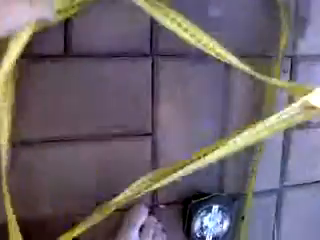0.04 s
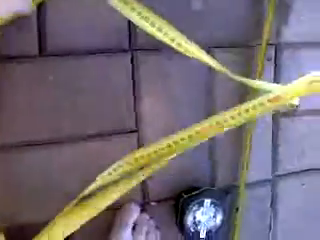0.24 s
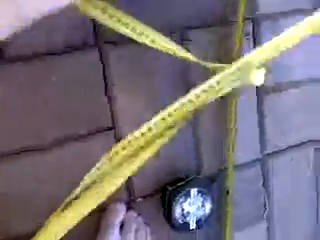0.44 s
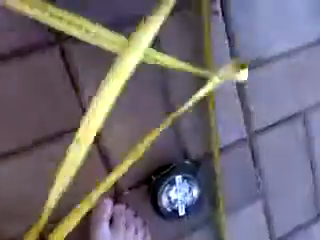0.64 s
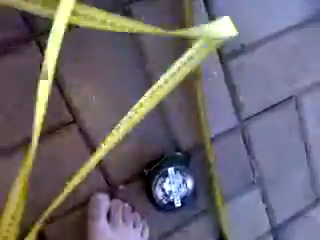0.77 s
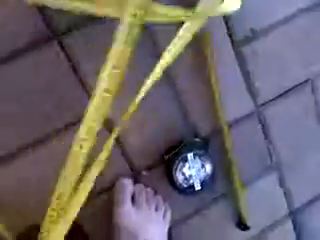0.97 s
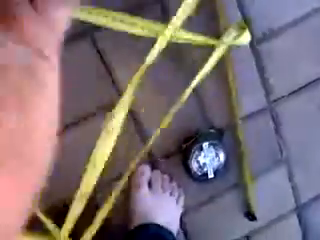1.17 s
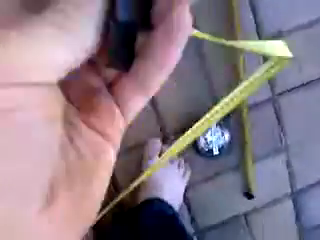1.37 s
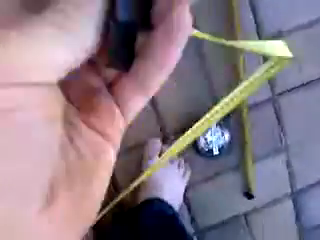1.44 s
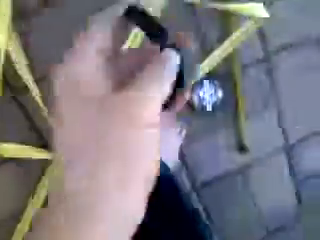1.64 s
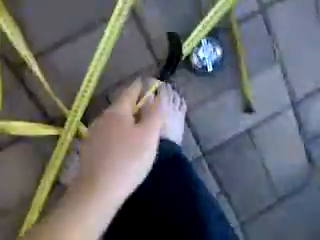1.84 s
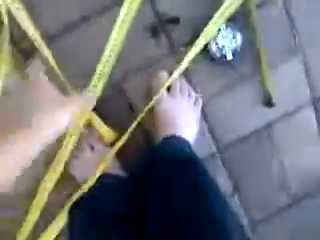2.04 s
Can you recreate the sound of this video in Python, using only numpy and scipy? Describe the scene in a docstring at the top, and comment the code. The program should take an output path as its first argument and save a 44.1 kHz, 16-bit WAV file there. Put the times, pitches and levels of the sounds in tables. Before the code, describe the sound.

A loose steel tape measure blade rattles and crinkles as it is bunched up by hand near the microphone. A bright burst comes at 0.25 seconds, then lighter ticks and one very sharp click at 0.85. Dense metallic chatter and scraping follow from 1.0 to 1.4. Another snap at 1.6 rings briefly, and the rattle fades by 2 seconds. A faint outdoor rumble lies underneath.

```python
"""A faint outdoor rumble, then a sharp snap and bursts of metallic chatter: a loose steel tape blade
is bunched up by hand close to a small mono microphone. Its loops slide and tap on one another, the
curved strip buckles with snaps, and an edge clicks, once very hard. Each contact excites the bending
modes of the thin steel, which are dispersive: the treble arrives first. Air and handling lie below."""
import sys
import numpy as np
from scipy import signal
from scipy.fft import rfft, irfft, next_fast_len
from scipy.io import wavfile
from scipy.ndimage import uniform_filter1d, minimum_filter1d, map_coordinates

SR = 44100
rng = np.random.default_rng(int(sys.argv[2]) if len(sys.argv) > 2 else 0)


def master_out(mix):
    """Clip the mix to full scale and print it as 16-bit PCM to the path in sys.argv[1]."""
    frames = np.transpose(np.atleast_2d(mix))
    ceiling = np.clip(frames, -1, 1)
    pcm = np.round(ceiling * 32767).astype(np.int16)
    wavfile.write(sys.argv[1], SR, pcm)


N = 92610
T = np.arange(N) / SR
TAIL = np.arange(SR // 3) / SR  # time since a contact

# Levels are relative within each table.
# spectra of the outdoor air, the low rumble and the bumps of the hand (f/Hz, level/dB)
AIR_SPECTRUM = [(60, -21), (130, -6.5), (180, -12.5), (300, -11), (400, -14), (700, -16.5), (1000, -15.5),
                (1600, -12), (2600, -19.5), (3100, -18.5), (7000, -29.5), (9000, -57.5)]
RUMBLE_SPECTRUM = [(12, -34), (20, 1.5), (59, -3.5), (100, 0.5), (147, -9), (178, -4.5), (455, -10),
                   (586, -13), (700, -14), (910, -39.5), (1540, -120)]
BUMP_SPECTRUM = [(20, 0), (50, 4.5), (95, -2), (160, -26), (400, -42)]
# envelope of the rumble (t/s, level/dB)
RUMBLE_ENVELOPE = [(0, -45), (.05, -46.5), (.55, -40.5), (.65, -43), (1.1, -42), (1.35, -45.5), (1.5, -56),
                   (1.6, -44.5), (2.1, -47.5)]
# envelope of a soft low hum (t/s, level/dB)
HUM_ENVELOPE = [(0, -64), (.045, -38), (.2, -44), (.3, -47), (.52, -45), (.62, -58.5), (2.1, -67)]
# the hand bumps the microphone's housing (t/s, level/dB, Gaussian width/s)
HAND_BUMPS = [(0.732, -38, 0.025), (1.444, -32, 0.029), (1.521, -29, 0.011)]
# envelope of the long loops' wobble (t/s, level/dB)
LOOP_ENVELOPE = [(0, -60), (.19, -58), (.215, -34.5), (.27, -30.5), (.34, -41), (.5, -46), (.7, -40.5),
                 (.755, -39), (.835, -48), (.865, -32), (.91, -39), (.98, -46), (1.06, -33.5), (1.12, -26),
                 (1.26, -34.5), (1.4, -42), (1.56, -55), (1.61, -38), (1.68, -42), (1.76, -47.5),
                 (1.95, -44.5), (2.1, -50)]
# spectrum of that wobble (f/Hz, level/dB)
LOOP_SPECTRUM = [(300, -31.5), (550, -13), (720, -16), (900, -3.5), (1150, -1.5), (1550, -2), (1850, -3),
                 (2600, -28), (5000, -61)]
# a free stretch of the blade sings briefly (t/s, f/Hz, bandwidth/Hz, level/dB, T60/s)
PINGS = [(.107, 2821, 150, -41, .18), (0.239, 2770, 497, -19, 0.26), (0.582, 2480, 500, -24.5, .12),
         (0.7346, 2600, 597, -17, 0.084), (1.1, 2300, 400, -16, 0.26), (1.394, 4420, 550, -18, 0.17),
         (1.526, 2310, 79.6, -26, .09), (1.597, 2410, 250, -15, 0.1), (1.677, 2164, 60, -21.5, 0.13)]
# an edge strikes hard (t/s, level/dB, rise time/s)
EDGE_STRIKES = [(0.7037, -8, .0005), (0.855, 6.5, 0.0012), (1.5968, -3, 0.0024)]
# modes of the struck edge (f/Hz, level/dB, T60/s)
EDGE_MODES = [(6300, 0.5, 0.017), (7180, -7.5, 0.014), (5432, -17, 0.048)]
# spectral envelope of the blade (f/Hz, level/dB)
STEEL_SPECTRUM = [(240, -37.5), (400, -26), (589, -22.5), (723, -24.5), (900, -18), (1200, -13),
                  (1550, -9.5), (1900, -5.5), (2200, -0.74), (2400, -0.7), (2850, -3), (3200, -6),
                  (3900, -4.5), (4400, -3.04), (5000, -0.5), (5900, -1), (6300, -1.3), (7050, -3.5),
                  (7400, -11.5), (9000, -53.5)]
# modes that outlast the blade's dense ring (f/Hz, level/dB)
BLADE_MODES = [(1154, -1), (1518, -19.5), (1810, 0.5), (2223, -0.5), (2363, -1.5), (2556, 2.5),
               (2795, -4.5), (4198, -6), (4551, -1), (5404, -2), (6138, -2), (6540, -12)]
# how hard the loops rub and chatter (t/s, level/dB)
EFFORT = [(0, -40), (.085, -53), (.125, -46), (.192, -45), (.205, -31), (.248, -11), (.28, -16), (.32, -25),
          (.365, -24), (.39, -22), (.46, -19.5), (.485, -26), (.53, -30), (.56, -23), (.6, -23), (.64, -28),
          (.665, -24), (.695, -28), (.73, -27), (.75, -21), (.78, -28), (.84, -30.5), (.87, -17.5),
          (.92, -18), (1.01, -26), (1.045, -14), (1.08, -14.5), (1.11, -11.5), (1.19, -14.5), (1.225, -14),
          (1.275, -19), (1.315, -19), (1.38, -24), (1.41, -19), (1.46, -25), (1.495, -25), (1.515, -31),
          (1.575, -31.5), (1.605, -14.5), (1.665, -20.5), (1.735, -24), (1.765, -20.5), (1.92, -35),
          (2, -36), (2.1, -45.5)]
# the strip buckles (t/s, level/dB, spectral tilt/(dB per octave))
SNAPS = [(.2455, -18, 10), (.252, -8, 4), (.377, -21, -3), (.4075, -21, -1), (0.5409, -25, -2.5),
         (0.581, -19.5, 0), (0.6601, -25, -2), (0.7034, -17.5, 2), (0.735, -12, 0), (0.8029, -23.5, -3),
         (0.8554, -10, -2.5), (.868, -13.5, -2), (0.9046, -14.5, 1.5), (1.2052, -12, 3),
         (1.221, -16.5, 8.5), (1.3458, -24.5, -1), (1.5905, -18.5, -2), (1.5968, -14.5, 1),
         (1.628, -26, 1.5), (1.9734, -32.5, 1)]

RING_T60_S, MODE_T60_S = .17, .25  # decay of the blade's dense ring and of its separate modes
MODE_DETUNING = .0061  # relative scatter of a mode's frequency as the strip bends
DISPERSION_S = .001192  # group delay of bending waves at 1 kHz
CONTACTS_PER_S = 600  # at an effort of -19.5 dB
DENSER_PER_DB, BRIGHTER_PER_DB = .21, .1148  # contact rate and treble, in dB per dB of effort
AIR_DB, SLIDE_DB, CHATTER_DB, SNAP_DB = -46.5, -2.5, -3, -1  # mixing gains


def amp(db):
    """Amplitude ratio of a level in decibels."""
    return 10 ** (np.asarray(db) / 20)


def unit_rms(x):
    """Normalisation to an rms of 1."""
    return x / np.sqrt(np.mean(x ** 2) + 1e-20)


def envelope(rows):
    """Linear interpolation of (t/s, level/dB) rows to one level per sample."""
    return np.interp(T, *np.transpose(rows))


def spectral_gain(spectrum, hz):
    """Magnitude response: (f/Hz, level/dB) rows interpolated on a logarithmic frequency axis."""
    f, db = np.transpose(spectrum)
    return amp(np.interp(np.log(hz + 1), np.log(f + 1), db))


def filtered(x, response):
    """Linear filtering: the spectrum of x is multiplied by a frequency response."""
    size = next_fast_len(len(x) + 8192)
    return irfft(rfft(x, size) * response(np.fft.rfftfreq(size, 1 / SR)), size)[:len(x)]


def low_pass(x, cutoff_hz, order):
    """Zero-phase filtering with a Butterworth magnitude response."""
    return filtered(x, lambda hz: 1 / np.sqrt(1 + (hz / cutoff_hz) ** (2 * order)))


def noise(spectrum):
    """Spectral shaping of white noise, at an rms of 1."""
    return unit_rms(filtered(rng.standard_normal(N), lambda hz: spectral_gain(spectrum, hz)))


def fluctuation(knots_per_s):
    """Smooth random modulation: a spline through Gaussian values."""
    return map_coordinates(rng.standard_normal(int(N * knots_per_s / SR) + 4), [T * knots_per_s])


def decay(t60):
    """Exponential damping by 60 dB in t60 seconds."""
    return np.exp(-np.log(1000) * TAIL / t60)


def add(out, start_s, x):
    """Superposition of x on out, beginning at start_s."""
    part = out[max(round(start_s * SR), 0):][:len(x)]
    part += x[:len(part)]


def background():
    """Outdoor air and handling as shaped noise, with a low hum that wavers by phase modulation."""
    hum_phase = 2 * np.pi * 60 * T + .5 * fluctuation(10)
    hum = np.sqrt(2) * np.sin(hum_phase) * amp(envelope(HUM_ENVELOPE))
    air = amp(AIR_DB) * noise(AIR_SPECTRUM)
    rumble = amp(envelope(RUMBLE_ENVELOPE)) * noise(RUMBLE_SPECTRUM)
    bumps = sum(amp(db) * np.exp(-.5 * ((T - t) / width_s) ** 2) for t, db, width_s in HAND_BUMPS)
    return air + rumble + hum + bumps * noise(BUMP_SPECTRUM)


def loop_wobble():
    """Modal overlap: the dense low bending modes of the hanging loops merge into a band of noise."""
    flutter = amp(1.5 * fluctuation(60))
    return amp(envelope(LOOP_ENVELOPE)) * unit_rms(flutter * noise(LOOP_SPECTRUM))


def pings():
    """Free vibration: a cluster of close modes in a free stretch of blade swells and dies away."""
    out = np.zeros(N)
    for t, hz, width_hz, db, t60 in PINGS:
        excitation = rng.standard_normal(len(TAIL))
        cluster = filtered(excitation, lambda f: 1 / (1 + (2 * (f - hz) / width_hz) ** 4))
        rise_s = .016 * t60
        shape = decay(t60) * (1 - np.exp(-TAIL / rise_s))
        add(out, t, amp(db) * unit_rms(cluster * shape) * np.sqrt(np.mean(shape ** 2)))
    return out


def edge_clicks():
    """Impact excitation: a hard strike of an edge sets high, strongly damped modes ringing."""
    out = np.zeros(N)
    ring = sum(amp(db) * decay(t60) * np.sin(2 * np.pi * hz * TAIL) for hz, db, t60 in EDGE_MODES)
    for t, db, rise_s in EDGE_STRIKES:
        onset = 1 - np.exp(-(TAIL / rise_s) ** 2)
        add(out, t, amp(db) * ring * onset)
    return out


def sliding():
    """Friction noise: steel scraping on steel gives a grainy hiss that follows the effort."""
    grain = amp(1.73 * fluctuation(250))
    return amp(SLIDE_DB + envelope(EFFORT)) * unit_rms(grain * noise(STEEL_SPECTRUM))


def brighten(x, corner_hz=4000):
    """Harder contact excites higher frequencies: the treble rises and falls with the effort."""
    treble = filtered(x, lambda hz: 1 / (1 + (corner_hz / (hz + 1)) ** 4))
    treble_gain = amp(BRIGHTER_PER_DB * (envelope(EFFORT) + 17.5))
    return x + treble * (treble_gain - 1)


def flex(x, depth_db=1.55):
    """Time-varying resonance: as the loops bend, random patches of the spectrum swell and fade."""
    spectrogram = signal.stft(x, nperseg=1024)[2]
    patches = rng.standard_normal(spectrogram.shape)
    for _ in range(2):
        patches = uniform_filter1d(patches, size=5, axis=0)  # across frequency
        patches = uniform_filter1d(patches, size=4, axis=1)  # across time
    gain = unit_rms(amp(depth_db * unit_rms(patches)))
    return signal.istft(spectrogram * gain, nperseg=1024)[1][:N]


def blade_response(crack_t60, ring_db, tilt_db):
    """Impulse response of unit energy: a crack, a dense ring and longer modes, spread by dispersion."""
    dense = rng.standard_normal(len(TAIL)) * (decay(crack_t60) + amp(ring_db) * decay(RING_T60_S))
    modes = np.zeros(len(TAIL))
    for hz, db in BLADE_MODES:
        strength = amp(db + 3 * rng.standard_normal())
        detuned_hz = hz * (1 + MODE_DETUNING * rng.standard_normal())
        modes += strength * np.sin(2 * np.pi * (detuned_hz * TAIL + rng.random()))

    def steel(hz):
        """Bending-wave dispersion: group delay falls as the square root of frequency rises."""
        khz = np.maximum(hz, 100) / 1000
        dispersion = np.exp(-4j * np.pi * hz * DISPERSION_S / np.sqrt(khz))
        return spectral_gain(STEEL_SPECTRUM, hz) * amp(tilt_db * np.log2(khz)) * dispersion
    ring = filtered(dense + amp(-22) * unit_rms(modes) * decay(MODE_T60_S), steel)
    return ring / np.linalg.norm(ring)


def chatter(places=12):
    """Random impacts: loops tap at several places on the strip, denser and harder with more effort."""
    effort_db = envelope(EFFORT)
    rate = CONTACTS_PER_S * amp(DENSER_PER_DB * (effort_db + 19.5))
    taps_due = np.cumsum(rate) / SR
    count = int(taps_due[-1])
    jitter, size_draw, place_draw = rng.random((count, 3)).T
    at = np.minimum(np.searchsorted(taps_due, np.arange(count) + 2 * jitter - .5), N - 1)
    scatter_db = 3 * np.minimum(-np.log(1 - size_draw), np.pi)  # capped exponential distribution
    # dividing by the root of the rate makes the mean power follow the effort alone
    strength = unit_rms(amp(scatter_db)) * amp(effort_db[at]) * np.sqrt(SR / rate[at])
    place = (place_draw * places).astype(int)
    out = np.zeros(N)
    for k in range(places):
        taps = np.bincount(at, strength * (place == k), N)
        ring = blade_response(crack_t60=.008, ring_db=-9, tilt_db=2.6 * rng.standard_normal())
        out += signal.fftconvolve(taps, ring)[:N]
    return amp(CHATTER_DB) * out


def snaps():
    """Snap-through buckling: the curved strip gives way suddenly, and its whole length rings."""
    out = np.zeros(N)
    for t, db, tilt_db in SNAPS:
        ring = blade_response(crack_t60=.03, ring_db=-7.5, tilt_db=tilt_db)
        add(out, t, amp(SNAP_DB + db) * np.sqrt(SR / 100) * ring)
    return out


def scene():
    """Superposition: the background and all the blade's vibrations add at one microphone."""
    mono = background()
    mono += flex(snaps() + brighten(sliding() + chatter()) + loop_wobble())
    mono += pings() + edge_clicks()
    return np.array([mono, mono])


def record(dry, ceiling=.95):
    """Band and peak limiting: the top treble is cut and a fast limiter holds the highest peaks."""
    narrow = low_pass(dry.mean(axis=0), cutoff_hz=7330, order=100)
    needed_gain = ceiling / np.maximum(np.abs(narrow), ceiling)
    smooth_gain = uniform_filter1d(minimum_filter1d(needed_gain, size=25), size=25)
    out = low_pass(narrow * smooth_gain, cutoff_hz=10500, order=40)
    return np.array([out, out])


dry = scene()
out = record(dry)
master_out(out)
```